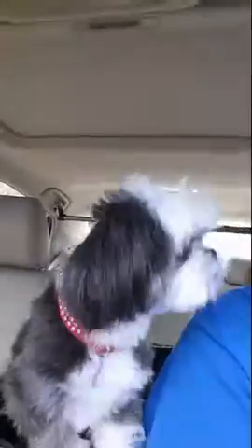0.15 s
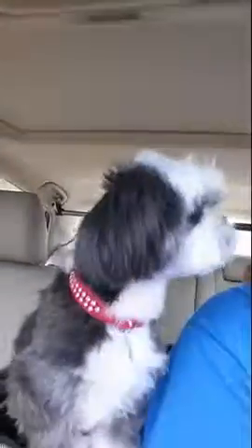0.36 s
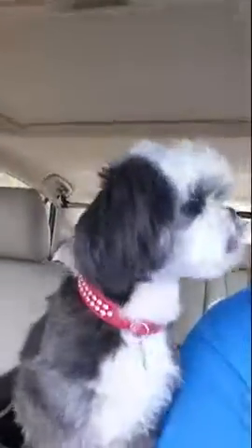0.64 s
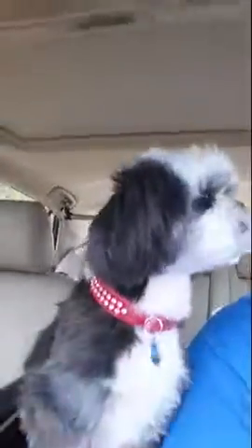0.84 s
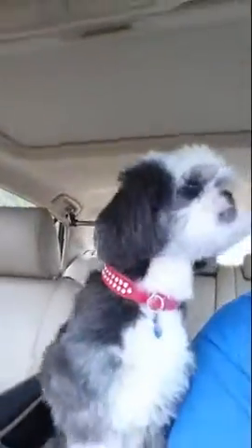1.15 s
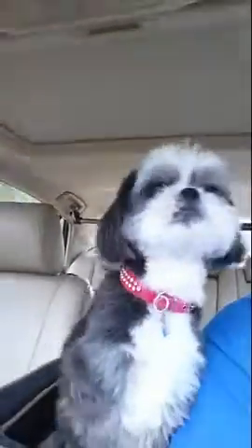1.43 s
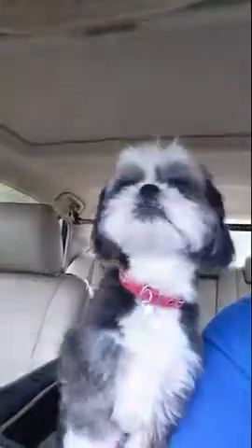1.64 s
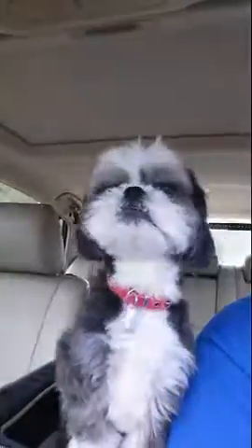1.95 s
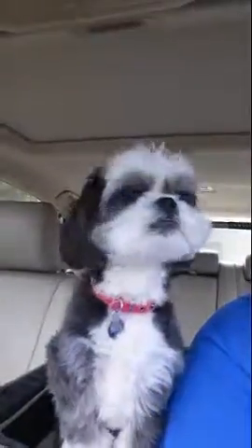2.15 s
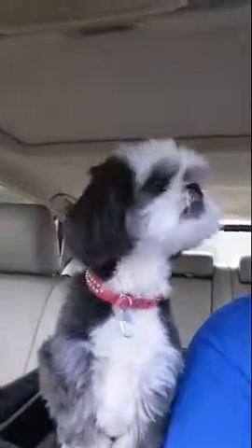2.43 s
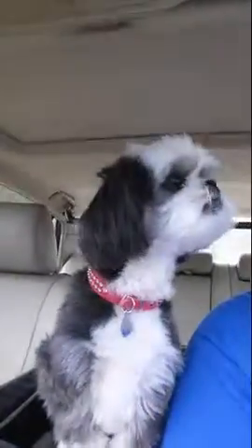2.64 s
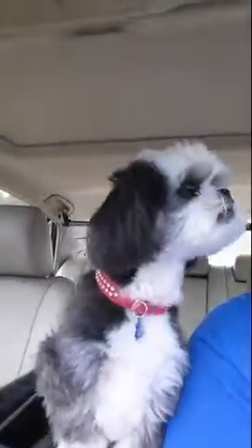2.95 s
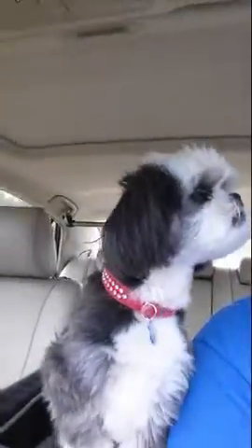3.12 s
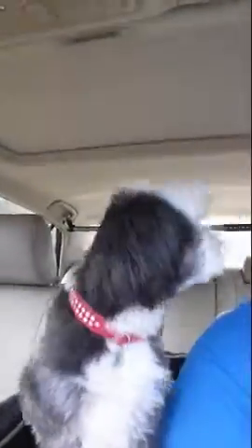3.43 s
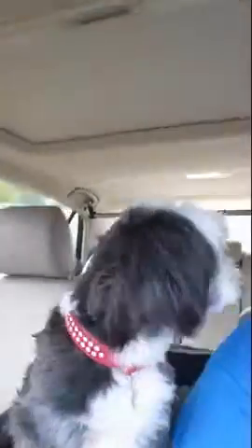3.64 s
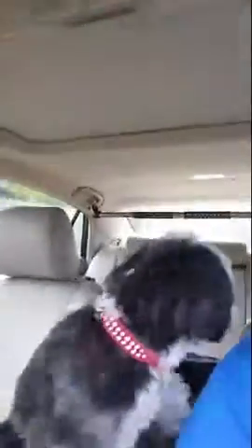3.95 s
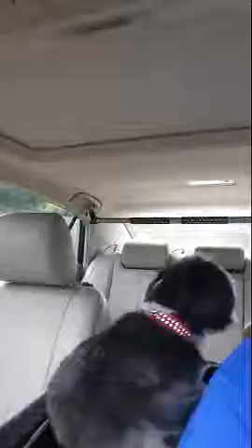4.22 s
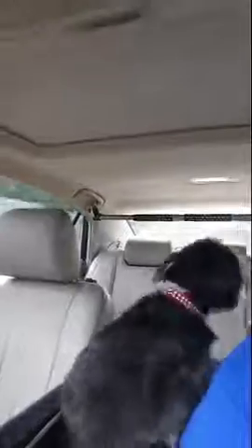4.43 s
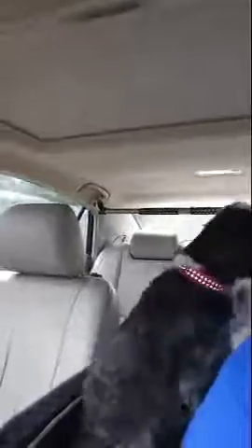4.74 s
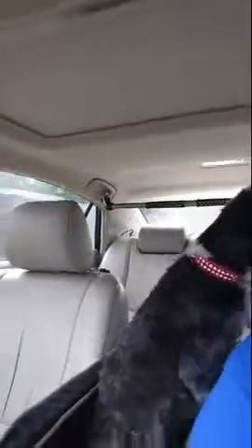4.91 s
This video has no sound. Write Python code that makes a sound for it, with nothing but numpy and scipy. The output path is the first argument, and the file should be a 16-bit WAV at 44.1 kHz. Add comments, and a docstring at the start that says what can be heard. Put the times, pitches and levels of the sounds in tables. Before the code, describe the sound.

Inside a padded car cabin, steady bassy tyre rumble underlies a little dog's thin, nearly pure whines. Two come in the first second and a half, then a pause with faint sniffing, then brief whimpers spread to the end, some cracking downward. Small wet nose snorts and a bright collar tick add detail; the boom swells around three seconds. Close stereo microphone, very short echoes, softened top end.

```python
"""A small dog whines in a moving car: eight thin, gliding whimpers, breathy with nasal hiss, with small snorts,
quick sniffs, faint whistles and ticks of its collar tag, over the rumble of the road in a padded cabin.
The voice is a near sine with its octave and blurred overtones; breath is shaped noise, snorts are
fluttering noise through nose resonances, and the road is coloured noise with resonant cabin modes."""
import sys
import numpy as np
from scipy import signal
from scipy.fft import rfft, irfft
from scipy.io import wavfile
from scipy.ndimage import uniform_filter1d, map_coordinates

SR = 44100
rng = np.random.default_rng(int(sys.argv[2]) if len(sys.argv) > 2 else 0)


def transcribe(u):
    """Save the signal u as a 16-bit wav file named by the first command-line argument.

    u: samples, shape (n,) or (channels, n), limited to [-1, 1]; the rate is SR.
    q: integer samples, one column per channel.
    """
    v = np.clip(np.atleast_2d(u).T, -1, 1)
    q = np.round(v * 32767).astype(np.int16)
    wavfile.write(sys.argv[1], SR, q)


N = 223953
TIME = np.arange(N) / SR
CUTOFF_HZ = 10950
RELEASE_S = 0.031
FLUTTER_PER_S = 191   # random knots per second of the air's rasp; the nostrils flap at twice this

# Whimpers. Each row: start and end in seconds, level in dB, fade over the whine in dB, octave at the start
# and at the end in dB ahead of the throat gain, nasal hiss in dB, hiss swell over the whine in dB,
# low overtones in dB, roughness (0-1) ahead of the plunges.
WHINES = [(-.01, 0.241, -15, -5.5, 2.5, 6.5, -37.5, -2, -9.5, 0.14),
          (0.653, 1.364, -20, -4.5, 2, -5, -42, -8, -11, 0.04),
          (2.486, 2.541, -20, 2.5, 4, 3.5, -46.5, -2, -19, 0.06),
          (2.573, 2.81, -18, -6, -2.5, -14.5, -43.5, -7.5, -8.5, 0.17),
          (3.37, 3.478, -22, 2.5, -2, 3.5, -38, 1, -44, 0.3),
          (3.865, 3.948, -14, -1, 0, -2, -34, -4.5, -17, 0.24),
          (4.249, 4.367, -20, 3.5, -2.5, -4, -41, 0, -25, 0.58),
          (4.724, 4.916, -17, -7, -3.5, -2.5, -39.5, -6.5, -8, 0.52)]
# Pitch track of each whimper ahead of the tremble. Each row: time in seconds, pitch in Hz.
GLIDES = [
    [(0.002, 923), (0.036, 758), (0.08, 852), (0.112, 845), (0.168, 701), (0.174, 674.5), (0.226, 691.4),
     (0.24, 783), (0.255, 724)],
    [(0.664, 1338), (0.684, 1182), (0.704, 1154), (0.726, 975), (0.73, 873), (0.736, 829), (0.792, 742),
     (0.82, 727), (0.835, 785.5), (0.856, 742), (0.9, 762.4), (0.948, 774.6), (0.988, 867), (1.11, 908),
     (1.14, 969), (1.234, 1130), (1.246, 1169), (1.288, 1136), (1.296, 1114), (1.368, 990)],
    [(2.496, 1194), (2.552, 1180)],
    [(2.586, 1016), (2.62, 870), (2.642, 870), (2.67, 939), (2.7, 905), (2.716, 1025), (2.754, 989),
     (2.762, 1100), (2.8, 1052), (2.815, 1140)],
    [(3.381, 1310), (3.405, 1325), (3.425, 1412), (3.452, 1343), (3.478, 1175)],
    [(3.877, 1583), (3.927, 1553), (3.952, 1277)],
    [(4.26, 1388), (4.272, 1401), (4.308, 1107), (4.322, 887), (4.344, 802), (4.378, 867)],
    [(4.732, 1365), (4.754, 1271), (4.776, 1246), (4.797, 1059), (4.822, 1008), (4.882, 1160),
     (4.918, 1071)],
]


def from_db(db):
    """Decibels to gain."""
    return 10 ** (np.asarray(db) / 20)


def rms_one(x):
    """Scale to unit power."""
    return x / np.sqrt(np.mean(x ** 2) + 1e-20)


def in_time(rows):
    """Each column of a curve, at every sample."""
    s, *columns = np.transpose(rows)
    return [np.interp(TIME, s, column) for column in columns]


def at_hz(points, hz):
    """Read a spectrum on a log-frequency axis."""
    f, value = np.transpose(points)
    return np.interp(np.log(np.maximum(hz, 1)), np.log(f), value)


def drift(knots_per_s):
    """Random wobble of rms 1, straight between its knots."""
    knots = rng.standard_normal(N // 8)
    return rms_one(map_coordinates(knots, [TIME * knots_per_s + 2], order=1, mode="wrap"))


def swell(centre_s, spread_s):
    """A Gaussian bump of height 1."""
    return np.exp(-.5 * ((TIME - centre_s) / spread_s) ** 2)


def band_filter(order, centre_hz, width_hz, kind="band"):
    """Butterworth sections around a centre frequency."""
    edges_hz = [centre_hz - width_hz / 2, centre_hz + width_hz / 2]
    return signal.butter(order, edges_hz, kind, fs=SR, output="sos")


def envelope(start, end):
    """Quick attack, hold, and a release that dies away."""
    attack_s, fall_db = 0.011, -22.5   # fall per RELEASE_S
    attack = np.clip((TIME - start) / attack_s, 0, 1)
    release = np.maximum(TIME - end, 0) / RELEASE_S
    return attack ** 2 * from_db(fall_db * np.minimum(release, 3)) * (release < 2)


def effort():
    """Breath drive: voice gain, hiss gain, octave dB, low overtones dB and roughness at every sample."""
    voice, hiss, manner = 0, 0, []
    for start, end, level_db, fade_db, first_octave_db, last_octave_db, hiss_db, swell_db, low_db, rough in WHINES:
        progress = np.clip((TIME - start) / (end - start), 0, 1)
        shape = envelope(start, end)
        voice = voice + shape * from_db(level_db + fade_db * progress)
        hiss = hiss + shape * from_db(hiss_db + swell_db * progress)
        manner += [(start, first_octave_db, low_db, rough), (end, last_octave_db, low_db, rough)]
    return [voice * faltering(), hiss] + in_time(manner)


def faltering():
    """Gain of the voice as the breath gives out and the folds falter at the end of each whine."""
    depth_db, knots_per_s = 7, 109.4
    ending = sum(swell(end + RELEASE_S / 2, RELEASE_S / 2) for start, end, *rest in WHINES)
    wobble = np.clip(drift(knots_per_s), -2, 1) - 1.5
    return from_db(depth_db * ending * wobble)


def plunging():
    """Extra roughness: the voice turns hoarse while its pitch falls quickly."""
    most_roughness, full_octaves_per_s = 0.43, 11.4
    octaves = np.log2(in_time(np.vstack(GLIDES))[0])
    fall = uniform_filter1d(-np.gradient(octaves) * SR, size=900)
    return most_roughness * np.clip(fall / full_octaves_per_s, 0, 1)


def folds(roughness):
    """Pitch and running phase of the vocal folds; pitch trembles and hoarseness makes the cycles uneven."""
    tremble = 0.009 * drift(60.87)
    jitter = 0.0124 * roughness * drift(450)
    pitch = in_time(np.vstack(GLIDES))[0] * (1 + tremble + jitter)
    return pitch, 2 * np.pi * np.cumsum(pitch) / SR


def pure_tone(on, hz, angle, voice, octave_db, roughness):
    """Fundamental and octave: the throat lifts the octave as it slides past, hoarseness smears it."""
    # Throat resonance. Each row: frequency in Hz, gain in dB against the fundamental.
    throat_gain = [(1350, -26), (1450, -5), (1540, -3), (1740, -13.5), (1880, -4), (2050, -16),
                   (2300, -14.5), (2600, -24), (3100, -37)]
    # Brief dips in the whine's level, as its gliding tone beats with the cabin's echoes.
    # Each row: centre in seconds, spread in seconds, depth in dB.
    dips = [(0.045, 0.01, -14), (0.117, 0.002, -8), (0.176, 0.0053, -9), (0.221, 0.0033, -7),
            (0.853, 0.0043, -4), (2.599, 0.0023, -7), (2.657, 0.0076, -5), (2.698, 0.0029, -13),
            (2.78, 0.0089, -3), (3.935, 0.004, -9), (4.355, 0.0044, -8), (4.749, 0.0018, -14),
            (4.785, 0.006, -13), (4.899, 0.004, -4)]
    flutter_db, patchy_db, knots_per_s = 2.45, 3.5, 50
    dip_db = sum(db * swell(s, spread_s) for s, spread_s, db in dips)
    fundamental = from_db(dip_db + flutter_db * drift(knots_per_s))[on]
    fuzz = 0.43 * (roughness * drift(350))[on]   # radians
    patches_db = patchy_db * drift(knots_per_s)[on]
    octave = from_db(octave_db[on] + at_hz(throat_gain, 2 * hz) + patches_db)
    return voice[on] * (fundamental * np.sin(angle) + octave * np.sin(2 * angle + fuzz))


def overtones(on, hz, angle, hiss, low_db, roughness):
    """Turbulence widens each overtone into a band, the high ones most; the muzzle's resonances colour them."""
    # Muzzle resonances. Each row: frequency in Hz, gain in dB ahead of the overtone level.
    muzzle = [(2030, 16), (2300, 10.5), (2740, 6), (3200, -0.5), (3700, -1.5), (4400, -8), (4750, -6.5),
              (5450, -9), (6200, -8.5), (7100, -7), (8500, -16.5), (9300, -10.5), (10000, -18),
              (10700, -18.5)]
    level_db, fading_db, fading_per_s = -3.0, 3.5, 32
    blur_share, hoarse_blur, blur_from_hz, blur_per_s = 0.85, 0.81, 4000, 290
    jaw_db, jaw_ring_hz, jaw_spread_hz = 19, 2640, 700
    jaw = swell(centre_s=0.193, spread_s=0.018)[on]   # the jaws open once
    tone = 0
    for k in range(3, 15):
        partial_hz = k * hz
        blur = (blur_share + hoarse_blur * roughness[on]) * (1 - jaw) * (partial_hz / blur_from_hz) ** 3
        knots = rng.standard_normal((2, 4096))
        a, b = (np.interp(TIME[on] * blur_per_s, np.arange(4096), row) for row in knots)
        partial = (1 + blur * a) * np.sin(k * angle) + blur * b * np.cos(k * angle)
        partial /= np.sqrt(1 + blur ** 2)
        low = np.clip((4300 - partial_hz) / 600, 0, 1)
        ring_db = jaw_db * jaw * np.exp(-.5 * ((partial_hz - jaw_ring_hz) / jaw_spread_hz) ** 2)
        patches_db = fading_db * (1 - jaw) * np.clip(drift(fading_per_s)[on], -3, 1.2)
        gain_db = level_db + at_hz(muzzle, partial_hz) + low * low_db[on] + ring_db + patches_db
        tone = tone + hiss[on] * from_db(gain_db) * partial * (partial_hz < CUTOFF_HZ)
    return tone


def whine(pitch, phase, voice, hiss, octave_db, low_db, roughness):
    """A near sine with its octave and breathy overtones; hoarseness makes its level shimmer."""
    on = voice > 0
    hz, angle = pitch[on], phase[on]
    tone = pure_tone(on, hz, angle, voice, octave_db, roughness)
    tone = tone + overtones(on, hz, angle, hiss, low_db, roughness)
    out = np.zeros(N)
    out[on] = np.sqrt(2) * tone
    return out * (1 + 0.13 * roughness * drift(500))


def whistles(fold_phase):
    """Faint higher tones in the airway with a pitch of their own; the folds chop their air, adding sum tones."""
    # Each row: start and end in seconds, first and last pitch in Hz, level in dB.
    whistle_rows = [(0.72, 1.359, 3200, 2744, -55.5), (2.498, 2.537, 2650, 2690, -47),
                    (3.863, 3.935, 2345, 2374, -42)]
    out = 0
    for start, end, first_hz, last_hz, level_db in whistle_rows:
        pitch = np.interp(TIME, [start, end], [first_hz, last_hz])
        phase = 2 * np.pi * np.cumsum(pitch * (1 + 0.0093 * drift(360))) / SR
        tone = np.sin(phase)
        for fold_multiple, db in ((2, -3), (5, -11)):
            tone = tone + from_db(db) * np.sin(phase + fold_multiple * fold_phase)
        out = out + np.sqrt(2) * from_db(level_db) * envelope(start, end) * tone
    return out


def nasal_notch(x):
    """The closed mouth is a side branch of the airway and swallows one band of the voice."""
    return signal.sosfilt(band_filter(2, centre_hz=3900, width_hz=700, kind="bandstop"), x)


def delayed(x, ms):
    """The same sound a little later."""
    return np.interp(TIME - ms / 1000, TIME, x, left=0)


def cabin(x):
    """Early echoes comb each side differently, so a gliding tone beats; a very short padded tail follows."""
    # Mouth to left and right microphone, direct and off windows, roof and seats.
    # Each row: delay in ms, level in dB.
    side_paths = [
        [(.297, -0.5), (4.2, -13.5), (4.82, -28), (5.98, -12), (7.74, -14.5), (9.28, -10.5)],
        [(.04, -5.5), (.26, -6), (.82, -17.5), (1.7, -14.5), (3.18, -33.5), (5.19, -12)],
    ]
    t60_s, tail_db = 0.21, -18
    t = TIME[:SR // 6]
    sides = []
    for paths in side_paths:
        tail = rng.standard_normal(len(t)) * from_db(-60 * t / t60_s) * (t > .005)
        diffuse = signal.fftconvolve(x, tail / np.linalg.norm(tail))[:N]
        early = sum(from_db(db) * delayed(x, ms) for ms, db in paths)
        sides.append(early + from_db(tail_db) * diffuse)
    return np.array(sides)


def coloured(spectrum, push):
    """Turbulent stereo air under a given push, through a set of resonances."""
    hz = np.arange(N // 2 + 1) * SR / N
    colour = rms_one(from_db(at_hz(spectrum, hz)) * (hz > spectrum[0][0]) * (hz < CUTOFF_HZ))
    return irfft(colour * rfft(push * rng.standard_normal((2, N))), N)


def cabin_noise(spectrum):
    """Stereo noise of a given colour, alike on both sides only in the bass; rms 1."""
    # Stereo width. Each row: frequency in Hz, side against mid in dB.
    width_curve = [(30, -31), (90, -41), (190, -23.5), (320, -8), (600, -18), (1100, -0.5), (1900, -2),
                   (10000, -0.5)]
    hz = np.arange(N // 2 + 1) * SR / N
    width = from_db(at_hz(width_curve, hz))
    mid, side = rfft(rng.standard_normal((2, N)))
    low_cut = np.minimum(hz / spectrum[0][0], 1) ** 2
    gain = from_db(at_hz(spectrum, hz)) * (hz < CUTOFF_HZ) * low_cut
    stereo = (mid + width * side * [[1], [-1]]) / np.sqrt(1 + width ** 2)
    return rms_one(irfft(gain * stereo, N))


def dog_air(hiss, phase):
    """Air rasps through the nose in each whine, chopped by the folds, and through nose and throat in each sniff."""
    # Sniffs and puffs. Each row: centre and spread in seconds, nose hiss in dB, throat rasp in dB.
    sniffs = [(1.968, 0.069, -48.5, -56), (2.406, 0.24, -54.5, -60), (2.923, 0.018, -48.5, -56),
              (3.31, 0.11, -50, -69), (3.822, 0.035, -47.5, -73), (4.175, 0.007, -47, -44.5),
              (4.432, 0.007, -52, -46), (4.679, 0.012, -52, -47), (5.015, 0.015, -47, -50)]
    # Relative air spectra of a whine, of the nose and of the throat. Each row: frequency in Hz, density in dB per Hz.
    nasal_air = [(2500, -10), (3900, -51), (4400, -15), (4750, 16.5), (5400, -7), (6400, 5), (7300, -11.5),
                 (8500, -4), (9300, -0.5), (9900, -0.5), (10700, -0.5)]
    nose_air = [(1500, 7), (2700, -8), (3600, -34), (4200, -29), (4750, 21), (6000, 17.5), (7200, 18.5),
                (8500, 9.5), (10800, 6)]
    throat_air = [(900, -32), (1800, 11.5), (3200, 8.5), (4500, -1), (9000, -29)]
    leak_db, chop, rasp_db = -11.5, 0.34, 1.5   # leak: unpitched air against the hiss level
    rasp = from_db(rasp_db * np.clip(drift(FLUTTER_PER_S), -2, 1.5))
    nose, throat = 0, 0
    for s, spread_s, nose_db, throat_db in sniffs:
        puff = swell(s, spread_s)
        nose = nose + from_db(nose_db) * puff
        throat = throat + from_db(throat_db) * puff
    breath = from_db(leak_db) * hiss * rasp * (1 + chop * np.cos(phase))
    return coloured(nasal_air, breath) + coloured(nose_air, nose) + throat * rasp * cabin_noise(throat_air)


def snorts():
    """The moist nostrils flap unevenly and let spurts of air into the nose's resonances."""
    # Each row: start in seconds, decay in seconds, level in dB.
    spurts = [(0.684, 0.012, -41), (0.801, 0.014, -36), (0.96, 0.014, -42), (2.672, 0.012, -42),
              (3.462, 0.02, -37), (4.338, 0.018, -27), (4.87, 0.025, -38)]
    # Nose resonances. Each row: centre in Hz, width in Hz, relative level in dB.
    nostrils = [(2920, 270, -11.5), (5540, 460, 4.5), (7100, 1200, -4), (9800, 400, -8)]
    rise_s, rasp_db = 0.0023, 5
    push = 0
    for s, decay_s, db in spurts:
        age = np.maximum(TIME - s, 0)
        decay = np.exp(-np.maximum(age - rise_s, 0) / decay_s)
        push = push + from_db(db) * np.minimum(age / rise_s, 1) * decay
    flaps_db = rasp_db * np.clip(drift(2 * FLUTTER_PER_S), -2, 1)
    air = rng.standard_normal((2, N)) * from_db(flaps_db)
    rings = sum(from_db(db) * signal.sosfilt(band_filter(2, hz, width_hz), air) for hz, width_hz, db in nostrils)
    return push * rms_one(rings)


def collar_tag():
    """Short bright ticks of noise, one faint and then a close pair, damped at once by fur."""
    # Each row: time in seconds, level in dB.
    ticks = [(0.535, -45), (3.182, -29.5), (3.184, -30.5)]
    decay_s = 0.0022
    strike = sum(from_db(db) * (TIME >= s) * np.exp(-np.abs(TIME - s) / decay_s) for s, db in ticks)
    return strike * cabin_noise([(1800, 2), (2600, 3), (4200, 0), (5300, 15), (8000, 2), (10800, -1)])


def cabin_mode(hz, width_hz):
    """An air mode of the cabin, shaken at random, nearly alike on both sides; rms 1."""
    side_db = -26.5
    mode = band_filter(1, hz, width_hz)
    # one second of run-in is dropped
    mid, side = signal.sosfilt(np.vstack([mode, mode]), rng.standard_normal((2, N + SR)))[:, SR:]
    return rms_one(mid + from_db(side_db) * side * [[1], [-1]])


def road():
    """Tyres shake the body: broad rumble, booming cabin modes, a swelling drone and a thin hiss of air."""
    # Rough stretches. Each row: centre in seconds, spread in seconds, boom swell in dB.
    rough_road = [(0.21, 0.15, 3.5), (3.082, 0.51, 13), (4.2, 0.24, 4)]
    # Relative spectra of rumble and air hiss. Each row: frequency in Hz, density in dB per Hz.
    rumble_spectrum = [(20, -12), (33, 2), (47, 2.5), (62, 3.5), (125, 1), (160, -5), (200, -7), (320, -8),
                       (520, -18), (900, -22.5), (1400, -29), (2200, -38), (3400, -46.5), (8000, -49)]
    air_spectrum = [(2500, -45), (3900, 7), (5000, 9), (6800, 14), (8500, 8), (10800, -60)]
    # Boom modes. Each row: centre in Hz, width in Hz, level in dB against the tyre boom.
    boom_modes = [(87.6, 16, -4), (98.4, 30, -3.5)]
    boom_db, rumble_db, drone_db, drone_swell_db, hiss_db = -30.5, -25.5, -41, 12, -58   # on smooth road
    rumble_share, left_lag_ms = 0.16, 0.099   # share of the swell (in dB) that reaches the rumble
    shake_db = sum(db * swell(s, spread_s) for s, spread_s, db in rough_road)
    rumble = from_db(rumble_db + rumble_share * shake_db) * cabin_noise(rumble_spectrum)
    boom = sum(from_db(boom_db + shake_db + db) * cabin_mode(hz, width_hz) for hz, width_hz, db in boom_modes)
    drone_gain = from_db(drone_db + drone_swell_db * swell(centre_s=3.04, spread_s=2.37))
    drone = drone_gain * cabin_mode(hz=159.4, width_hz=19.6)
    left, right = rumble + boom + drone
    return np.array([delayed(left, left_lag_ms), right]) + from_db(hiss_db) * cabin_noise(air_spectrum)


def scene():
    """The dog close by in the cabin, over the road."""
    voice, hiss, octave_db, low_db, roughness = effort()
    roughness = roughness + plunging()
    pitch, phase = folds(roughness)
    dog = whine(pitch, phase, voice, hiss, octave_db, low_db, roughness) + whistles(phase)
    return cabin(nasal_notch(dog)) + dog_air(hiss, phase) + snorts() + collar_tag() + road()


def record(dry):
    """A steep low-pass cuts the top."""
    return signal.sosfilt(signal.ellip(12, .2, 80, CUTOFF_HZ, fs=SR, output="sos"), dry)


dry = scene()
out = record(dry)
transcribe(out)
```